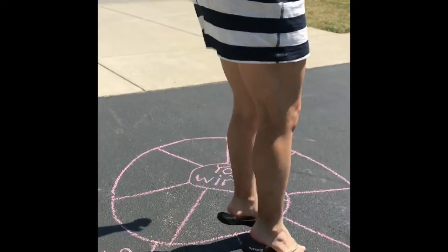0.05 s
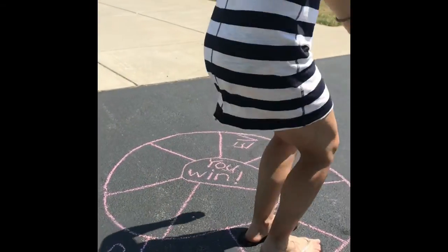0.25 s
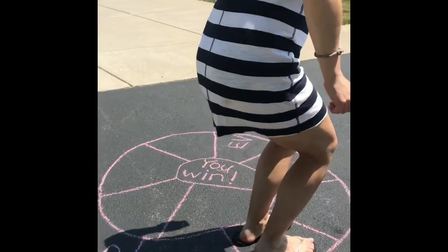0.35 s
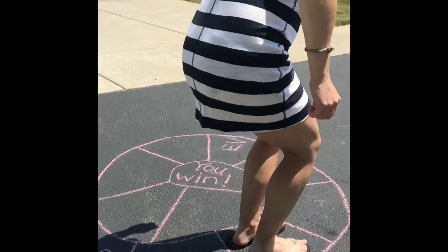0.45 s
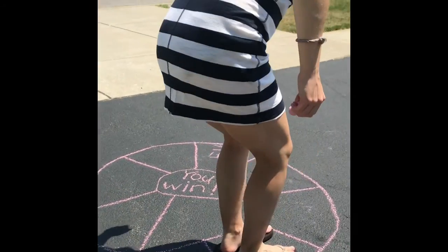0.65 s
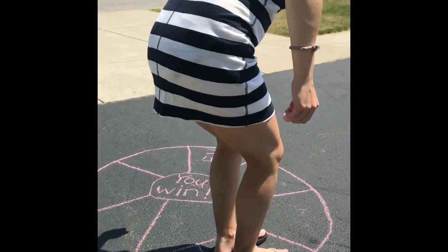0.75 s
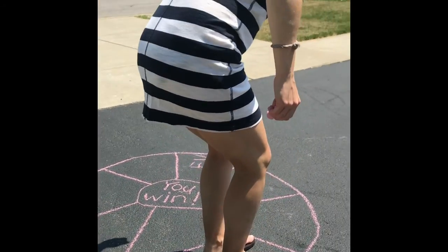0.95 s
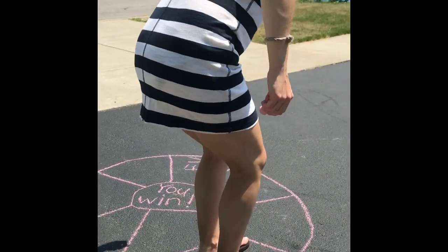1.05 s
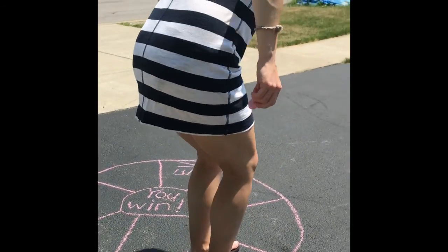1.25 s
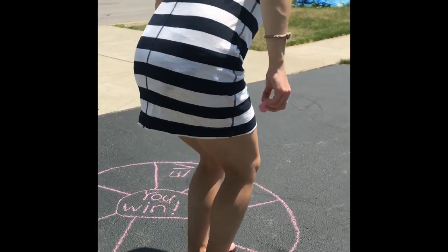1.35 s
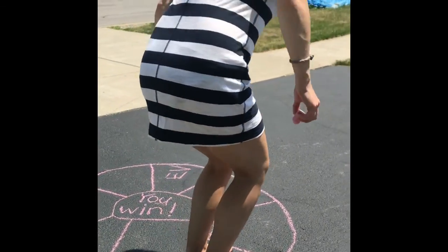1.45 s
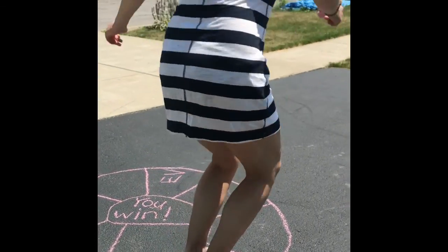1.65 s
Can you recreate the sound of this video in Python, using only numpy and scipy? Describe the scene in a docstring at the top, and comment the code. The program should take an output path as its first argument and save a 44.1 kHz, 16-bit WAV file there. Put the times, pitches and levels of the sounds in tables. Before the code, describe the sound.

Sandals slap on an asphalt driveway in a single hop: a light toe touch just before 0.2 seconds, then a sharp, quick cluster of gritty slaps with a faint echo. Faint birds whistle at the very start. At about 0.6 seconds a low puff of air brushes the microphone. A distant engine hums under a quiet outdoor wash, fading as birds chirp again from about 1.5 seconds.

```python
"""Birds whistle over a far engine's hum and a steady outdoor wash. At 0.16 s a person in slide sandals,
hopping on an asphalt driveway, touches a toe down; from 0.21 s the soles slap in a quick cluster.
Each contact squeezes a pocket of air, rings the sole and crunches grit; the yard echoes faintly.
At 0.64 s a puff of air brushes the microphone. From 1.55 s birds chirp again as the engine fades."""
import sys
import numpy as np
from scipy import signal
from scipy.fft import rfft, irfft
from scipy.io import wavfile

SR = 44100
rng = np.random.default_rng(int(sys.argv[2]) if len(sys.argv) > 2 else 0)


def to_wav(sig):
    """Store sig (one row per channel, or 1-D mono) as 16-bit WAV at the path in sys.argv[1].

    Samples outside -1..1 are clipped; the rate is SR.
    """
    pcm = np.clip(np.atleast_2d(sig), -1, 1) * 32767
    pcm = np.round(pcm).astype(np.int16)
    wavfile.write(sys.argv[1], SR, pcm.T)  # frames by channels


N = 74970
T = np.arange(N) / SR


def from_db(db):
    """Decibels to gain."""
    return 10 ** (np.asarray(db) / 20)


def unit_rms(x):
    """Scale to rms 1."""
    return x / np.sqrt(np.mean(x ** 2) + 1e-20)


def curves(rows):
    """Join timed rows by straight lines, one curve per value column."""
    times_s, *columns = np.transpose(rows)
    return [np.interp(T, times_s, column) for column in columns]


def noise(colour):
    """Unit-rms noise. Each colour row: frequency in Hz, relative density in dB."""
    hz, db = np.transpose(colour)
    bins_hz = np.maximum(np.fft.rfftfreq(N, 1 / SR), 1)
    gain = from_db(np.interp(np.log(bins_hz), np.log(hz), db))
    return unit_rms(irfft(rfft(rng.standard_normal(N)) * gain, N))


def drift(corner_hz):
    """Slow random wander, unit rms."""
    lowpass = 1 + (np.fft.rfftfreq(N, 1 / SR) / corner_hz) ** 2
    return unit_rms(irfft(rfft(rng.standard_normal(N)) / lowpass, N))


def age(start_s):
    """Seconds since the start, zero before it."""
    return np.maximum(T - start_s, 0)


def decay(start_s, t60_s):
    """Envelope: instant onset, exponential fall."""
    return (T >= start_s) * np.exp(-np.log(1000) * age(start_s) / t60_s)


def bump(start_s, rise_s):
    """Envelope: rises to 1 in rise_s, then dies away."""
    rises = age(start_s) / rise_s
    return rises * np.exp(1 - rises)


def air():
    """Steady outdoor wash."""
    # Each row: frequency in Hz, relative density in dB.
    colour = [(20, -21), (35, 0), (55, 5), (110, 1), (200, -5), (400, -13.5), (1100, -16.5), (2000, -24.5),
              (4500, -29), (7000, -34.5), (10500, -41), (12500, -39), (16000, -42.5)]
    # Each row: time in seconds, level in dB.
    levels = [(0, -52), (.3, -54), (.7, -55), (1.2, -55), (1.7, -55)]
    level_db, = curves(levels)
    return from_db(level_db) * noise(colour)


def puff(peak_s=.636, decay_s=.02, level_db=-34, hz=61):
    """Air brushes the microphone: one soft, low swell."""
    swell = np.exp(-abs(T - peak_s) / decay_s)
    return from_db(level_db) * swell * np.sin(2 * np.pi * (hz * T + rng.random()))


def engine(waver_db=2):
    """Far engine: harmonics of the firing rate, each wavering on its own."""
    # Each row: time in seconds, firing rate in Hz, level in dB.
    running = [(0, 83.7, -47.5), (.25, 81.34, -59), (.5, 84.5, -55), (.78, 83.3, -49), (1.0, 83.37, -48.5),
               (1.22, 83.1, -54.5), (1.4, 82.74, -54), (1.7, 86.7, -77.5)]
    # Each row: multiple of the firing rate, relative level in dB.
    harmonics = [(1, 0), (2, -14.5), (3, -22.5)]
    firing_hz, level_db = curves(running)
    phase = 2 * np.pi * np.cumsum(firing_hz) / SR
    return sum(from_db(level_db + db + waver_db * drift(corner_hz=5.5)) * np.sin(multiple * phase)
               for multiple, db in harmonics)


def reflection(x, delay_s, gain_db, t60_s):
    """One diffuse, dying return from the yard."""
    # Each row: frequency in Hz, relative level in dB.
    colour = [(200, -6), (1000, 1.5), (2200, -3), (4200, 0.5), (9000, -5), (16000, -2)]
    response = unit_rms(noise(colour) * decay(delay_s, t60_s)) / np.sqrt(N)
    return from_db(gain_db) * signal.fftconvolve(x, response)[:N]


def birds(attack_s=.016, release_s=.005, trill_hz=356.4, waver_db=2):
    """Gliding whistles among trees and houses; two voices close in pitch beat as a trill."""
    # Each row: start and length in seconds, level in dB, start, middle and end pitch in Hz,
    # trill depth from 0 to 1, relative octave level in dB.
    notes = [(-.01, 0.095, -46, 2210, 2308, 2462, 0.04, -42),
             (.078, 0.015, -50.5, 2660, 2820, 3020, 0.25, -40),
             (.079, 0.035, -68.5, 5000, 5280, 5150, .05, -3),
             (.119, 0.065, -45, 2110, 2172, 2020, 0.1, -34), (1.545, 0.013, -58, 3300, 3590, 3950, .1, -40),
             (1.553, 0.0462, -51.5, 4200, 4625, 4510, 0.87, -30),
             (1.599, 0.0146, -59.5, 3750, 3340, 3037, 0.12, -35),
             (1.645, 0.03, -65, 2950, 3210, 3660, 0, -34), (1.66, 0.042, -60, 3750, 4200, 4240, .5, -26)]
    song = np.zeros(N)
    for start_s, length_s, db, start_hz, middle_hz, end_hz, depth, octave_db in notes:
        progress = np.clip((T - start_s) / length_s, 0, 1)
        glide = np.polyfit([0, .5, 1], [start_hz, middle_hz, end_hz], 2)
        pitch_hz = np.polyval(glide, progress)
        envelope = np.clip(length_s * np.minimum(progress / attack_s, (1 - progress) / release_s), 0, 1)
        phase = 2 * np.pi * np.cumsum(pitch_hz - depth * trill_hz / 2) / SR
        voices = (np.sin(phase) + depth * np.sin(phase + 2 * np.pi * trill_hz * T)) / (1 + depth)
        song += from_db(db) * envelope * (voices + from_db(octave_db) * np.sin(2 * phase))
    song *= from_db(waver_db * drift(corner_hz=40))
    return song + reflection(song, delay_s=.0095, gain_db=-7.5, t60_s=.13)


def drags():
    """Short, dull rubs of the sole as it settles on the ground."""
    # Each row: start in seconds, peak level in dB, rise in seconds.
    rubs = [(.137, -51.5, 0.0023), (.166, -41.5, 0.0044), (0.2112, -38.5, 0.0017), (.221, -40.5, 0.0039),
            (0.2327, -37.5, 0.0023)]
    # Each row: frequency in Hz, relative density in dB.
    colour = [(100, -20), (200, -6.5), (300, 4.5), (500, 0), (750, -4), (1000, -0.5), (1400, -2.5),
              (2500, -12.5), (6000, -27), (16000, -46)]
    return sum(from_db(db) * bump(start_s, rise_s) for start_s, db, rise_s in rubs) * noise(colour)


def grit(crunches, skim_start_s=.2033, skim_end_s=.2072, skim_db=-29, scuff_db=-19.5):
    """Grit under the sole: a skim swells into the slap; each contact crunches, with a scuff tail."""
    # Each row: frequency in Hz, relative density in dB.
    colour = [(200, -16.5), (500, 2), (800, -18.5), (1200, 3), (1800, 20), (3000, -9), (4500, 1.5),
              (7500, -4), (10500, -16.5), (15500, -10.5)]
    skim_ramp = age(skim_start_s) / (skim_end_s - skim_start_s) * (T < skim_end_s)
    power = from_db(skim_db) ** 2 * skim_ramp
    for start_s, db in crunches:
        envelope = decay(start_s, t60_s=.0085) + from_db(scuff_db) * decay(start_s, t60_s=.048)
        power += (from_db(db) * envelope) ** 2
    return np.sqrt(power) * noise(colour)


def foot_thud(start_s):
    """The foot's dull thud through the sole."""
    # Each row: frequency in Hz, relative level in dB, rise in seconds.
    tones = [(312.6, -5.5, 0.0017), (500, 0, .0016)]
    return sum(from_db(db) * bump(start_s, rise_s) * np.sin(2 * np.pi * hz * age(start_s))
               for hz, db, rise_s in tones)


def sole_ring(start_s):
    """The struck sole rings in damped modes of alternating sign."""
    # Each row: frequency in Hz, relative level in dB, T60 in seconds.
    modes = [(1010, -1, .015), (1283, -9, 0.017), (1730, -4.5, .012), (2844, -15.5, 0.012),
             (3140, -3.5, .011), (3905, -11, .008), (5273, -12.5, .008), (8323, -11.5, .007)]
    return sum((-1) ** k * from_db(db) * decay(start_s, t60_s) * np.sin(2 * np.pi * hz * age(start_s))
               for k, (hz, db, t60_s) in enumerate(modes))


def air_pop(start_s, hz, rise_s):
    """A pocket of air squeezed under the sole."""
    return bump(start_s, rise_s) * np.sin(2 * np.pi * hz * age(start_s))


def snap(start_s, centre_hz=5500, width_hz=3200):
    """A contact's sharp edge: a click in one broad resonance."""
    click = np.full(N, 1e-18)
    click[int(start_s * SR)] = 1
    radius = np.exp(-np.pi * width_hz / SR)
    feedback = [1, -2 * radius * np.cos(2 * np.pi * centre_hz / SR), radius ** 2]
    return (1 - radius ** 2) / 2 * signal.lfilter([1, 0, -1], feedback, click)


def sandals(low_cut_hz=1118):
    """Each contact: a slap (air pop, ring, snap) thinned by a low cut, a thud and grit."""
    # Each row: start in seconds, pop gain in dB, pop pitch in Hz, pop rise in seconds,
    # then ring, snap, grit and thud gains in dB.
    contacts = [(0.1640, -33, 2650, .0004, -50.5, -37, -50.5, -55),
                (0.2073, -0.5, 2378, 0.0002, -27, 7.5, -19.5, -46),
                (0.2119, -17.5, 1715, .0008, -12, -8, -15.5, -30.5),
                (0.2205, -34.5, 1500, .0005, -34, -27.5, -35.5, -41),
                (0.2344, -13, 1970, 0.00011, -31, -12.5, -23, -35.5),
                (0.2361, -14, 2040, 0.00033, -30.5, -18.5, -30, -46)]
    slap, thud = np.zeros((2, N))
    crunches = []
    for start_s, pop_db, pop_hz, pop_rise_s, ring_db, snap_db, grit_db, thud_db in contacts:
        slap += from_db(pop_db) * air_pop(start_s, pop_hz, pop_rise_s)
        slap += from_db(ring_db) * sole_ring(start_s)
        slap += from_db(snap_db) * snap(start_s)
        thud += from_db(thud_db) * foot_thud(start_s)
        crunches.append((start_s, grit_db))
    low_cut = signal.butter(4, low_cut_hz, "high", fs=SR, output="sos")
    return signal.sosfilt(low_cut, slap + 1e-18) + thud + grit(crunches)


def scene():
    """The hop and its yard echoes over the background, mono."""
    # Each row: delay in seconds, gain in dB, T60 in seconds.
    echoes = [(0.011, -27, .2), (0.121, -38.5, 0.55)]
    hop = sandals() + drags()
    yard = sum(reflection(hop, delay_s, db, t60_s) for delay_s, db, t60_s in echoes)
    return (hop + yard + birds() + engine() + puff() + air())[None]


def record(dry):
    """Steep low-pass on the top treble."""
    stop_hz, stop_db = 17400, 60
    return signal.sosfilt(signal.cheby2(12, stop_db, stop_hz, fs=SR, output="sos"), dry)


dry = scene()
out = record(dry)
to_wav(out)
```